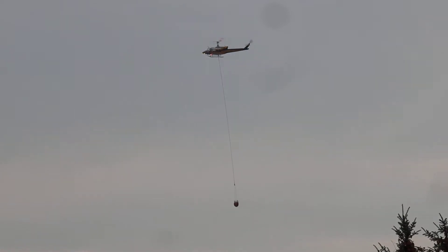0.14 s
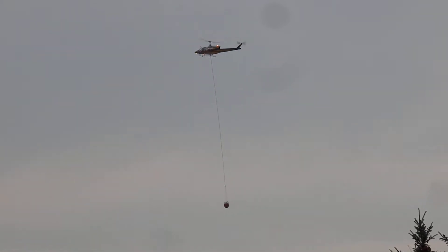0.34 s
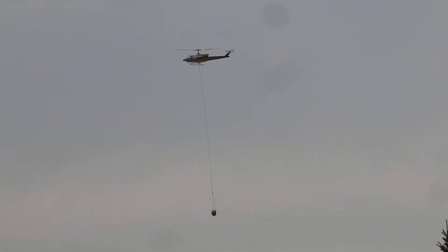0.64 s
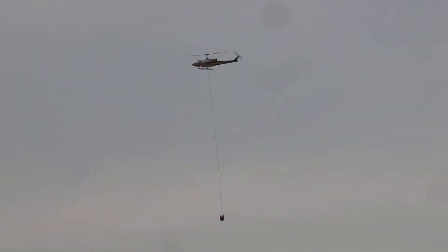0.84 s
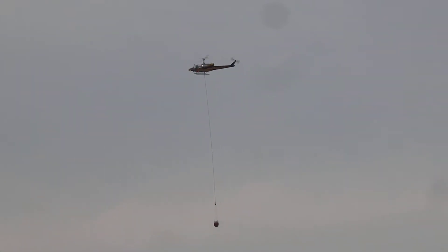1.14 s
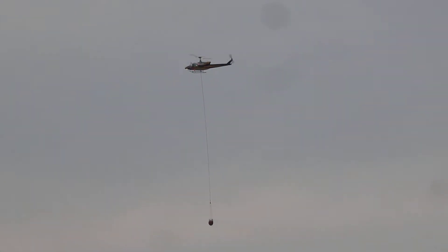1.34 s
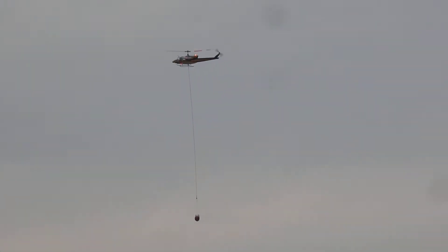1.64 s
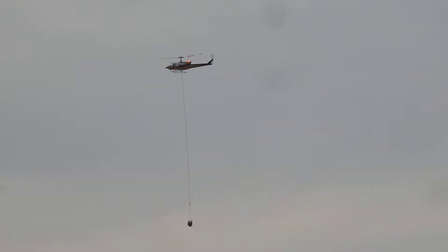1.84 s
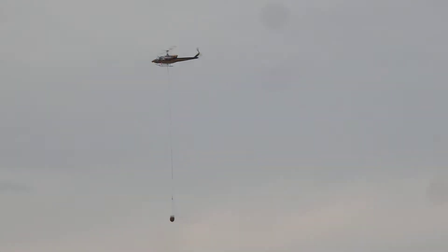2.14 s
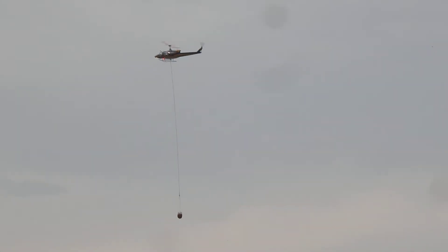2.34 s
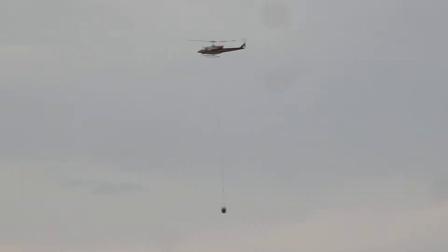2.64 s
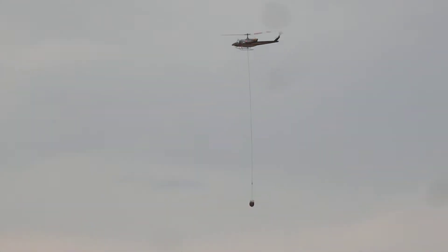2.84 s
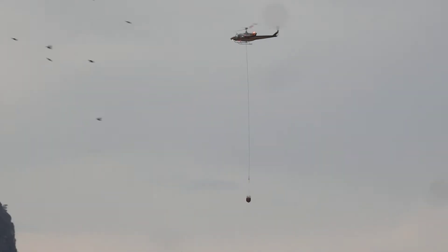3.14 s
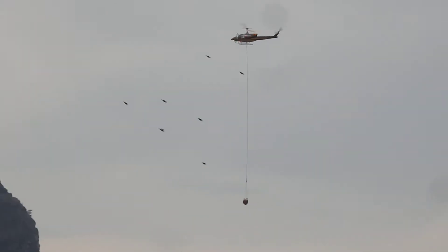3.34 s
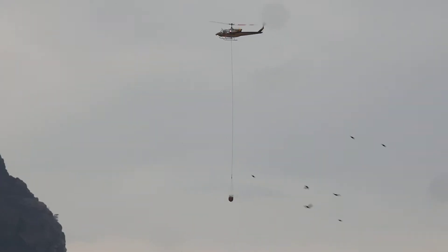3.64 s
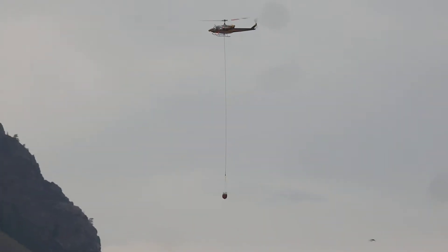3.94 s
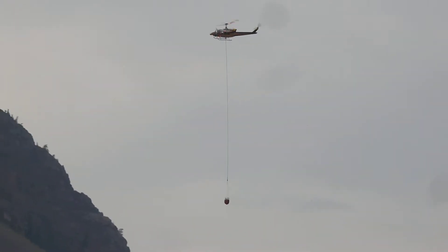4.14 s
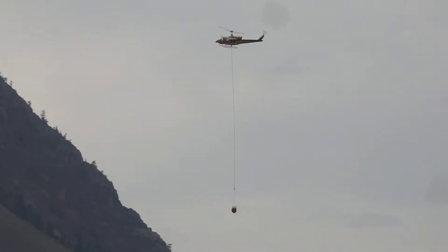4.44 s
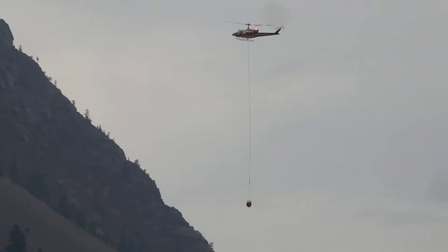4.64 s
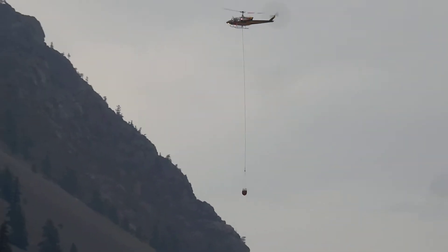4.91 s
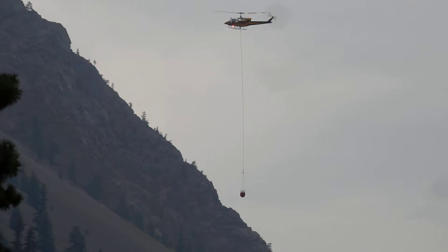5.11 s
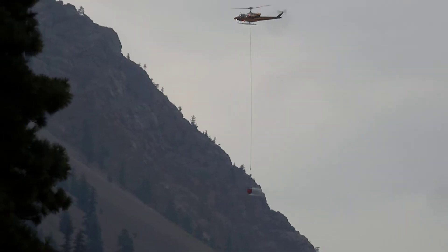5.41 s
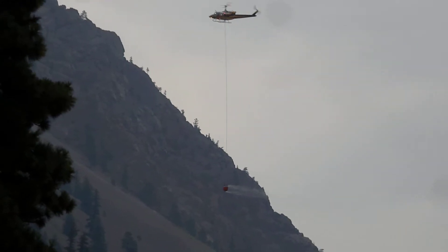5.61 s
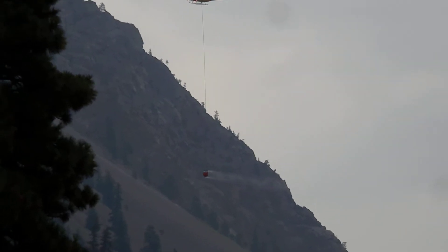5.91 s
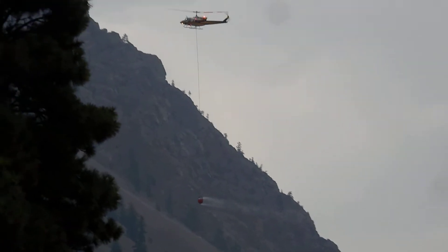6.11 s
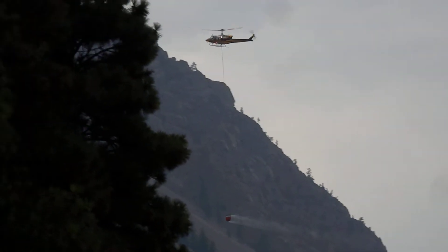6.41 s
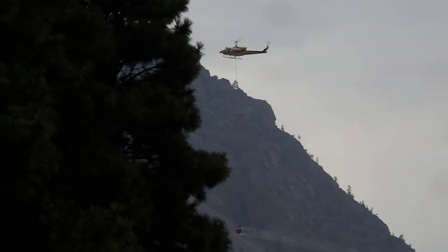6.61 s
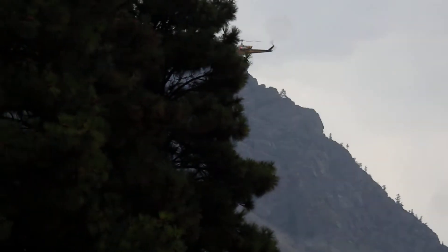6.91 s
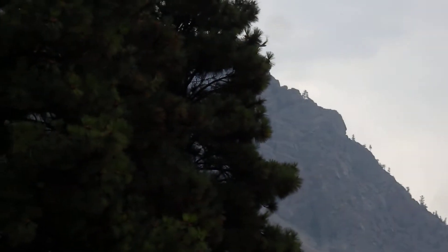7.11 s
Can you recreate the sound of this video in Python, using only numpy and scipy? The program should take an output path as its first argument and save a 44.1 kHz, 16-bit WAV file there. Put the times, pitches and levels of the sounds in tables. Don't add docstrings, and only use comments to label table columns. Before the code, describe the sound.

A helicopter with a long-line bucket passes over a valley, rapid blade slaps over a roaring engine, with wind buffeting and cloth rustling near the microphone.

```python
import sys
import numpy as np
from scipy import signal
from scipy.io import wavfile
from scipy.ndimage import uniform_filter1d, minimum_filter1d

SR = 44100
rng = np.random.default_rng(int(sys.argv[2]) if len(sys.argv) > 2 else 0)


def boost(x):
    u = np.asarray(x, float) / 20
    return 10 ** u


def digitize_waveform(pressure):
    field = np.atleast_2d(pressure).T
    bounded = np.clip(field, -1, 1)
    quanta = np.round(bounded * 32767).astype(np.int16)
    wavfile.write(sys.argv[1], SR, quanta)


N = 320166
T = np.arange(N) / SR


def evened(x):
    return x / np.sqrt(np.mean(x ** 2) + 1e-20)


def curve(rows, order):
    return np.interp(T, [r[0] for r in rows], [r[order] for r in rows])


def read(points, hz):
    f, value = np.transpose(points)
    return np.interp(np.log(hz + 1), np.log(f + 1), value)


def colour(x, points):
    log_gain = np.log(boost(read(points, abs(np.fft.fftfreq(8192, 1 / SR)))))
    taps = np.fft.ifft(np.exp(np.conj(signal.hilbert(log_gain)))).real[:4096]
    return evened(signal.oaconvolve(x, taps)[:N])


def drift(hz):
    return evened(signal.lfilter(*signal.butter(2, hz, fs=SR), rng.standard_normal(N)))


def late(x, ms):
    return np.array([np.interp(T - ms / 1000, T, c) for c in np.atleast_2d(x)])


def swells(rows, rise_db_s, fall_db_s):
    start, length, db = np.transpose(rows)[:3, :, None]
    rise = rise_db_s * np.maximum(start - T, 0)
    fall = fall_db_s * np.maximum(T - start - length, 0)
    return boost(db - rise - fall)


# frequency in Hz, left-right likeness from 0 to 1.
LIKENESS = [(60, 0.76), (300, 1), (520, 0.97), (900, .94), (1500, 0.8), (2600, 0.23), (5000, 0.14)]
# frequency in Hz, left-right difference in dB.
BODY_SHADOW = [(1200, 0.5), (1900, 0), (2700, -4), (3600, -0.5)]


def pair(points, patchy_db):
    frames, hz = N // 128 + 5, np.fft.rfftfreq(512, 1 / SR)
    a, b, c, d, patches = rng.standard_normal((frames, 257, 5)).T
    patches = uniform_filter1d(patches, size=5, axis=0)
    patches = evened(uniform_filter1d(patches, size=16, axis=1))
    same = np.clip(read(LIKENESS, hz), 0, 1)[:, None]
    left = a + 1j * b
    right = same * left + np.sqrt(1 - same ** 2) * (c + 1j * d)
    z = np.array([left, right])
    z *= boost(read(points, hz)[:, None] + patchy_db * patches)
    z *= boost(np.outer([.5, -.5], read(BODY_SHADOW, hz)))[:, :, None]
    return evened(signal.istft(z, nperseg=512, noverlap=384)[1][:, :N])


# time in seconds, ground delay in ms, slope delay in ms,
# share of the retreating blade (linear).
ECHO_PATHS = [(0, 2.21, 4.0, 0.085), (2.5, 2.09, 3.8, 0.079), (4.5, 2.134, 3.8, 0.094),
              (5.2, 2.35, 3.87, 0.067), (5.8, 2.49, 4.04, 0.083), (6.4, 2.63, 4.13, 0.029),
              (6.9, 2.73, 4.22, .05), (7.26, 2.9, 4.45, 0.046)]


def ground(x, share, slope):
    dull = signal.filtfilt(*signal.butter(1, 1500, fs=SR), x)
    off_ground = late(dull, curve(ECHO_PATHS, order=1))
    off_slope = late(dull, curve(ECHO_PATHS, order=2))
    return x + share * off_ground + slope * off_slope


# frequency in Hz, level in dB.
SNAP_TONE = [(100, -37.5), (230, -19), (330, 1), (450, 1), (580, 3.5), (750, -3), (1000, -9.5), (1500, -33),
             (2200, -34), (3500, -41), (9000, -90)]


def tail_snaps(tail, wake):
    passes = np.diff(np.floor(tail + .009 * drift(hz=25)), prepend=0) > 0
    snaps = colour(passes * boost(4.3 * wake + 1.0 * drift(hz=40)), SNAP_TONE)
    snaps = snaps - curve(ECHO_PATHS, order=3) * late(snaps, ms=7.8)
    fading = np.exp(-(tail % 1) / .25)
    puffs = colour(rng.standard_normal(N) * fading * boost(3 * wake), SNAP_TONE)
    return snaps + boost(-11) * puffs


def main_thump(main):
    gap = (main + 0.5504) % 1 - .5
    thump = -np.exp(-(gap / .022) ** 2) * boost(1.5 * drift(hz=7))
    return evened(signal.lfilter(*signal.butter(2, 42, "high", fs=SR), thump))


# frequency in Hz, level in dB.
ROAR_TONE = [(25, -17), (60, -3), (130, -7), (300, -8), (500, -4.5), (800, -9.5), (1400, -14.5),
             (1800, -19.5), (2200, -25.5), (2900, -32), (3500, -42.5), (4500, -49.5), (9000, -56)]


def engine_roar(tail, wake):
    beat_db = 0.77 * wake + 0.85 * np.cos(2 * np.pi * (tail - .18))
    return ground(pair(ROAR_TONE, patchy_db=1.43) * boost(7.0 + beat_db), share=0.38, slope=0.089)


# multiple of the blade rate, level over the path in dB.
HUM_ORDERS = [
    (1, -1.5),
    (2, -8),
    (3, 6),
    (4, 4),
]


def tail_hum(tail, wake):
    hum = 0
    for multiple, db in HUM_ORDERS:
        level_db = db + 2.0 * drift(hz=3.4) + 0.99 * wake
        hum = hum + boost(level_db) * np.cos(2 * np.pi * multiple * tail)
    swing_s, swing_length_s, shade_db = 2.23, 0.54, -6
    shade = np.clip((swing_s + swing_length_s - T) / swing_length_s, 0, 1)
    return ground(hum, share=0.78, slope=0.051) * boost(shade_db * shade)


# time in seconds, passes per second.
TAIL_PASSES = [(0.0, 57.334), (0.908, 57.084), (1.815, 57.5), (2.722, 57.451), (3.63, 57.726),
               (4.538, 57.859), (5.445, 58.125), (6.352, 58.587), (7.26, 58.494)]
# time in seconds, passes per second.
MAIN_PASSES = [(0.0, 12.104), (0.908, 11.153), (1.815, 11.123), (2.722, 11.35), (3.63, 11.273),
               (4.538, 11.375), (5.445, 11.286), (6.352, 11.444), (7.26, 11.369)]
# time in seconds, path strength in dB,
# aim of the rotors at the listener in dB.
FLIGHT_PATH = [(0.0, -29.5, -16), (0.4, -31.5, 11), (1.0, -30.5, 5), (1.4, -32, 0.5), (2.0, -28.5, 10),
               (2.45, -30.5, 7.5), (2.75, -27.5, 5.5), (3.05, -21, 6), (3.5, -25.5, 8.5),
               (4.15, -27.5, 9.5), (4.55, -23, 8), (5.0, -22.5, 9), (5.7, -22, 6.5), (6.3, -26, 8),
               (6.8, -23.5, 8), (7.26, -24, 8.5)]


def helicopter():
    tail = .52 + np.cumsum(curve(TAIL_PASSES, order=1)) / SR
    main = -.22 + np.cumsum(curve(MAIN_PASSES, order=1)) / SR
    wake = np.cos(2 * np.pi * (main - .075)) + .12 * np.cos(4 * np.pi * (main + .02))
    rotors = boost(-2.5) * tail_snaps(tail, wake) + boost(-10.0) * main_thump(main)
    rotors = ground(rotors, share=.78, slope=0.37)
    path_db, aim_db = curve(FLIGHT_PATH, order=1), curve(FLIGHT_PATH, order=2)
    flying = (rotors * boost(aim_db) + engine_roar(tail, wake)) * boost(path_db - 1.0)
    hum = tail_hum(tail, wake) * boost(0.36 * path_db - 18)
    return (flying + hum) * boost([[-.3], [.3]])


# frequency in Hz, level in dB.
HISS_TONE = [(100, -4), (3000, 16.5), (5000, 11), (8000, 4.5), (11000, 2), (16000, 2.5)]


def microphone_hiss():
    return boost(-54.0) * pair(HISS_TONE, patchy_db=1.9)


# frequency in Hz, level in dB.
BUFFET_TONE = [(20, -18.5), (50, -6.5), (110, -0.5), (200, -7), (330, -12), (600, -26.5), (1200, -44),
               (3000, -74.5)]
# start in seconds, length in seconds, force in dB.
WIND_GUSTS = [(.1, 0.089, -14.5), (.36, .3, -13), (.75, .3, -11.5), (1.35, 0.076, -13), (1.6, 0.032, -6.5),
              (1.86, 0.37, -3), (2.4, 0.26, -19), (2.97, 0.02, -25), (3.62, 0.13, -28), (4.1, 0.071, -30),
              (4.6, 0.457, -9.5), (5.2, 0.44, -10), (5.72, 0.15, -11.5), (6.22, 0.1, -15.5),
              (6.6, 0.16, -11.5), (7.22, .05, -32)]


def buffet():
    lumps_db = 3.2 * drift(hz=11.9) + 2.95 * drift(hz=68)
    return colour(rng.standard_normal(N) * boost(lumps_db), BUFFET_TONE)


def wind():
    left, right = buffet(), buffet()
    calm_db = -28
    force = boost(calm_db) + swells(WIND_GUSTS, rise_db_s=90, fall_db_s=73.5).max(0)
    return force * np.array([boost(-18) * left + 0.09 * right, right])


# start in seconds, length in seconds, pressure in dB, band centre in Hz.
CLOTH_STROKES = [(.1, 0.24, -60.5, 5220), (.6, .45, -72, 6780), (1.1, .3, -65, 6400),
                 (1.6, .3, -62.5, 5400), (2.1, .65, -59.5, 6015), (2.97, 0.063, -58.5, 5500),
                 (3.22, .2, -54, 5650), (3.5, .5, -62.5, 5900), (4.1, .42, -55.5, 6077),
                 (4.6, .17, -52.5, 6400), (4.98, 0.55, -56, 5400), (5.6, 0.087, -51, 5775),
                 (5.97, 0.21, -63, 4850), (6.22, 0.065, -58, 5110), (6.47, 0.27, -51, 5140),
                 (6.74, 0.18, -43.5, 4780), (7.0, .27, -48.5, 4840)]
# frequency in Hz, width in Hz, level in dB.
CLOTH_FOLDS = [
    (2800, 750, 9),
    (4150, 360, 5.5),
    (5500, 1100, -3.5),
]


def cloth_rub():
    press = swells(CLOTH_STROKES, rise_db_s=81.5, fall_db_s=80)
    centre = np.transpose(CLOTH_STROKES)[3] @ press / press.sum(0)
    turn = np.exp(2j * np.pi * np.cumsum(centre) / SR)
    band = signal.lfilter(*signal.butter(2, 1900, fs=SR), rng.standard_normal((2, 2, N)))
    rustle = evened(((band[0] + 1j * band[1]) * turn).real)
    noise = rng.standard_normal((2, N))
    folds = 0
    for hz, width, db in CLOTH_FOLDS:
        ring = signal.butter(2, [hz - width / 2, hz + width / 2], "band", fs=SR)
        folds = folds + boost(db) * signal.lfilter(*ring, noise)
    low = np.clip((5400 - centre) / 700, 0, .9)
    rub = (1 - low) * rustle + 1.27 * low * evened(folds)
    grain = boost(1.95 * drift(hz=300) + 1.0 * drift(hz=26) + 5.5)
    rest_db = -82.5
    return rub * grain * (boost(rest_db) + press.max(0)) * boost([[1.4], [-1.4]])


# frequency in Hz, level in dB.
CREASE_TONE = [(2000, -18), (4000, -5), (6000, 2.5), (9500, -2.5), (11500, -13), (16000, -35)]
# time in seconds, peak in dB, length in seconds, left-right difference in dB.
CLOTH_CREASES = [(2.145, -29, 0.0033, 2.5), (2.352, -34, 0.003, -10), (2.581, -30, 0.0066, 4),
                 (2.637, -40, 0.0025, -1), (2.8579, -36, 0.0016, 14), (2.88, -27, 0.0016, 9),
                 (3.0046, -30, 0.0022, 8), (4.127, -66, 0.0027, 0), (4.417, -29, 0.0022, 12),
                 (4.586, -17, 0.0042, 1.5), (4.611, -25, 0.0034, -11), (4.6774, -36, 0.003, 9),
                 (4.751, -17, 0.0044, 7), (5.367, -30, 0.0037, -2), (5.648, -26.5, 0.0047, 1),
                 (5.7194, -33, 0.003, 8), (7.057, -51, 0.003, -3)]


def cloth_creases():
    out = np.zeros((2, N))
    bright = pair(CREASE_TONE, patchy_db=2.5)
    for s, db, length, pan_db in CLOTH_CREASES:
        span = slice(round((s - .03) * SR), round((s + .06) * SR))
        age = T[span] - s - .002
        shape = np.exp(-abs(age) / length) + 0.1 * np.exp(-abs(age) / 0.017)
        sides_db = np.array([[pan_db], [-pan_db]]) / 2
        out[:, span] += bright[:, span] * shape * boost(db - 11.0 + sides_db)
    return out


def scene():
    return helicopter() + microphone_hiss() + wind() + cloth_rub() + cloth_creases()


# time in seconds, gain after the step in dB, tick in dB.
GAIN_STEPS = [(0.0, -4, -20.7), (0.3623, -0.5, -21), (0.5007, -2.5, -27), (0.8, -4.5, -30),
              (1.0673, -4.5, -25), (1.4465, -3.5, -26), (1.594, -7.5, -32), (1.856, -11, -29),
              (2.0855, -9, -27.5), (2.279, -10, -29), (2.939, -5.5, -23), (3.0264, -5, -19),
              (3.375, -5, -16), (3.814, 3.5, -20.5), (3.8247, -2.6, -24), (4.0844, -1.75, -22.5),
              (4.346, -2.3, -25), (4.5332, -3, -22), (4.6045, -8, -17), (4.7933, -7.5, -28.5),
              (4.9664, -9.5, -23), (5.441, -6.5, -28), (5.6006, -5, -21.5), (5.7549, -7, -22),
              (5.928, -4, -30.3), (6.1914, -4.5, -38), (6.46, -6.5, -22), (6.731, -4.5, -26),
              (6.8164, -8, -24), (7.159, -4.5, -19.5)]


def gain_control(dry):
    s, gain_db, tick_db = np.transpose(GAIN_STEPS)
    last = np.searchsorted(s, T, "right") - 1
    recovery_db_s = 17.5
    gain = boost(gain_db[last] + recovery_db_s * (T - s[last]))
    x = dry * uniform_filter1d(gain, size=60)
    room = np.minimum(.97 / (abs(x).max(0) + 1e-9), 1)
    x = x * uniform_filter1d(minimum_filter1d(room, size=301), size=301)
    ticks = np.zeros(N)
    ticks[np.round(s[1:] * SR).astype(int)] = boost(tick_db[1:])
    return x + signal.lfilter([1.1], [1, -.45], ticks)


def band_limit(x):
    return signal.sosfilt(signal.butter(12, 15830, fs=SR, output="sos"), x)


def record(dry):
    dry = signal.lfilter(*signal.butter(2, 24, "high", fs=SR), dry)
    mix = gain_control(dry)
    return band_limit(mix)


dry = scene()
out = record(dry)
digitize_waveform(out)
```